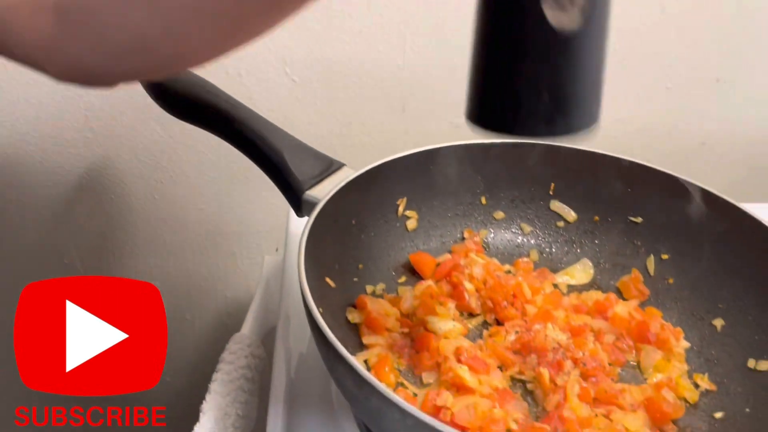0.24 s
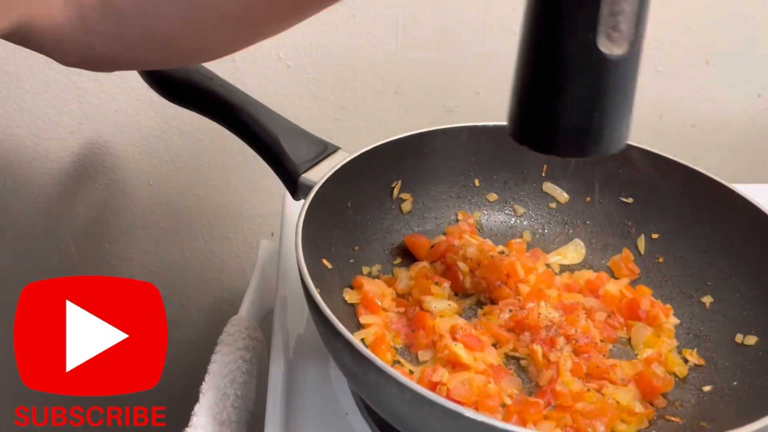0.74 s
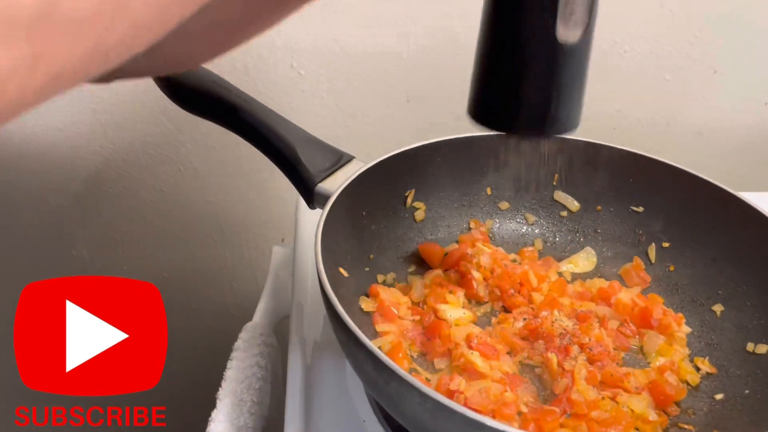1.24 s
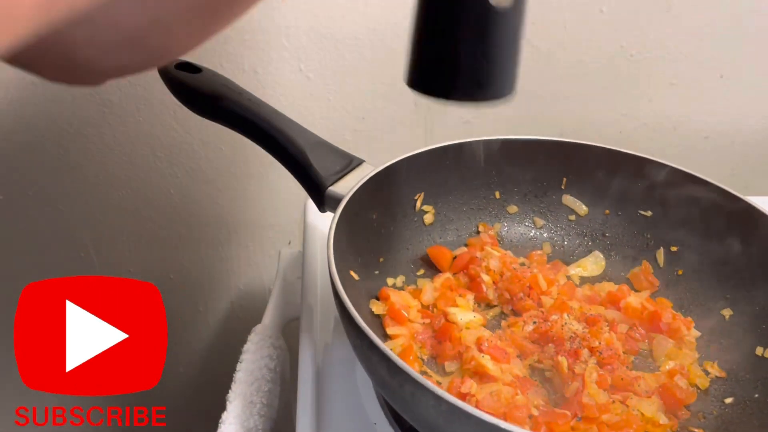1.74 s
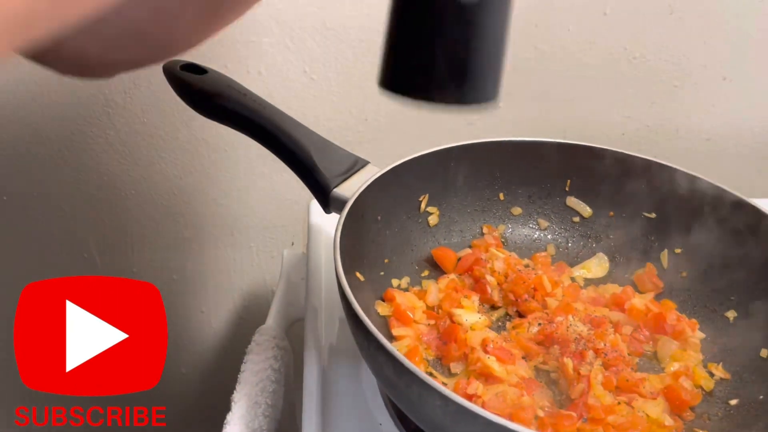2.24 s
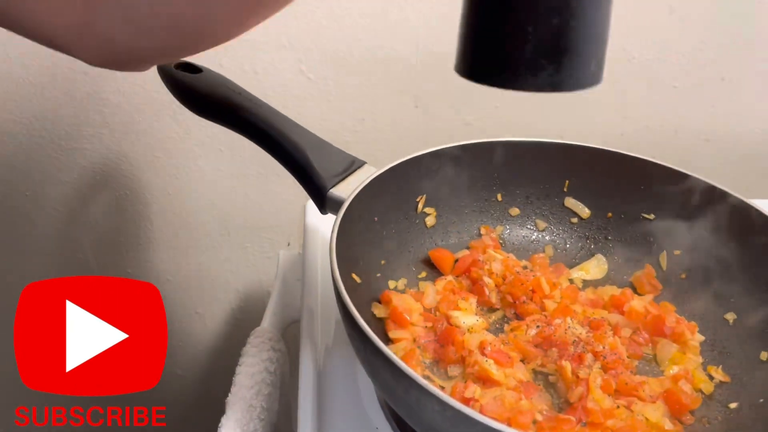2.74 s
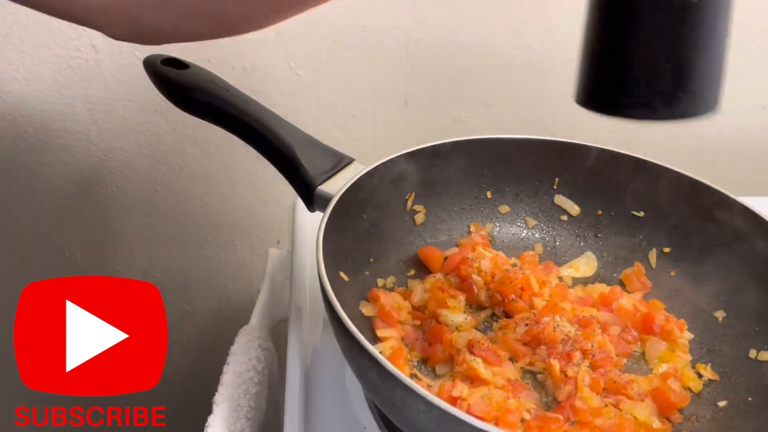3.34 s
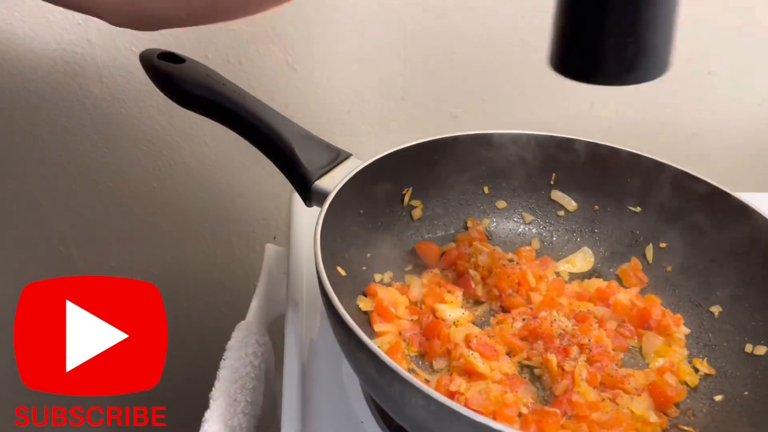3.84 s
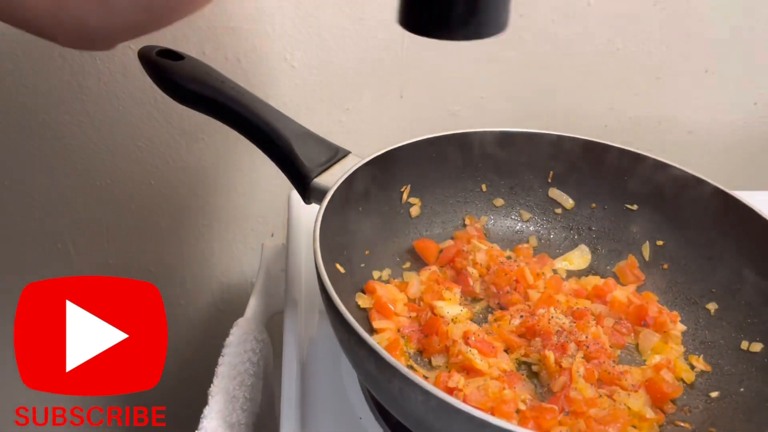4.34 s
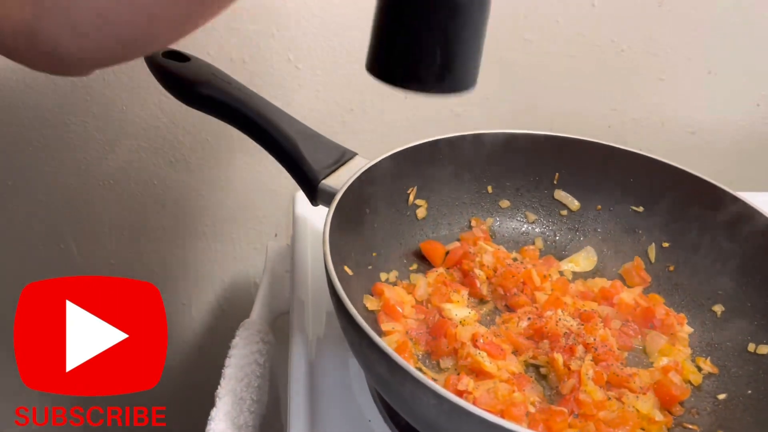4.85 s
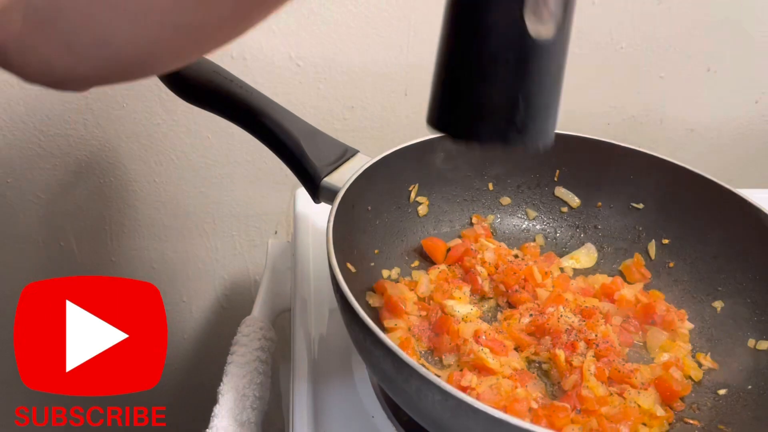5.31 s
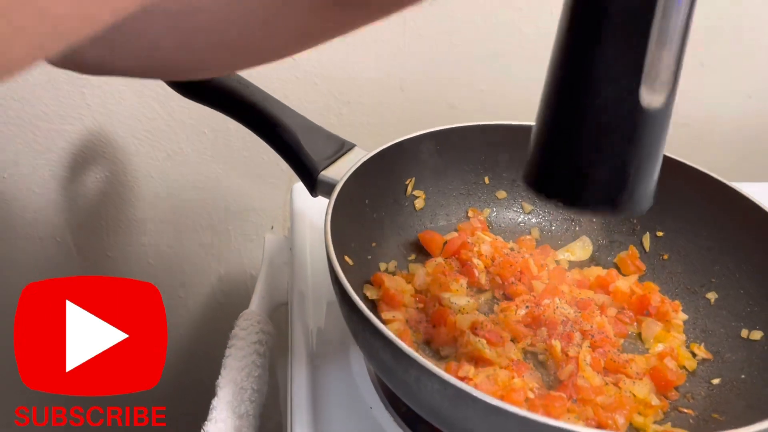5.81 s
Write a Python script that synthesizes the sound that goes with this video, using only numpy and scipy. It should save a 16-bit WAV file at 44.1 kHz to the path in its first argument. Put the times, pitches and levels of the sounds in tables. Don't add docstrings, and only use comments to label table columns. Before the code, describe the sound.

Dry peppercorns snap and grind in a hollow mill, twist after twist, while vegetables fry with fine hiss and spitting fat in a humming kitchen.

```python
import sys
import numpy as np
from scipy import signal
from scipy.fft import rfft, irfft, next_fast_len
from scipy.io import wavfile
from scipy.ndimage import uniform_filter1d

SR = 44100
rng = np.random.default_rng(int(sys.argv[2]) if len(sys.argv) > 2 else 0)


def put_to_file(sound):
    columns = np.atleast_2d(sound).T
    safe = np.clip(columns, -1, 1)
    whole_steps = np.round(safe * 32767)
    wavfile.write(sys.argv[1], SR, whole_steps.astype(np.int16))


def linear_from_db(decibels):
    return 10 ** (np.asarray(decibels, float) / 20)


N = 267907
PADDED = next_fast_len(N)
HZ = np.fft.rfftfreq(PADDED, 1 / SR)

# start_s, peak_db, low_db (0.5-1.4 kHz), ring_hz (favoured by the grip)
CRACKS = [(0.018, -12.5, -7.5, 3540), (0.032, -15.5, -23, 3700), (0.523, -20.5, -14, 2340),
          (0.574, -15.5, -39, 4400), (0.608, -11.5, -16.5, 3240), (0.613, -11.5, -19, 2210),
          (0.652, -5, -16.5, 4200), (1.104, -17.5, -23, 4270), (1.122, -16, -16, 2600),
          (1.164, -10, -12.5, 1650), (1.199, -20.5, -26, 4400), (1.713, -18.5, -7.5, 4200),
          (1.748, -19.5, -18, 3040), (1.756, -19, -16, 3020), (2.27, -20.5, -11, 3180),
          (2.321, -15, -18, 2230), (2.35, -19.5, -29, 3470), (2.416, -12.5, -9, 3030),
          (2.849, -16.5, -9, 4030), (2.878, -20.5, -22, 3080), (2.919, -15, -14.5, 4150),
          (3.4333, -8, -11.5, 2070), (3.478, -15.5, -11, 3360), (4.514, -6.5, -10.5, 3500),
          (4.54, -5, -10.5, 3570), (5.105, -17, -6, 3300), (5.591, -15.5, -13, 4330),
          (5.628, -16.5, -12, 4200), (5.639, -11.5, -6.5, 4180), (5.688, -20.5, -5, 2070)]
# pitch_hz, width_hz, level_db
BODY = [(417, 123, -14), (702, 140, -13.5), (998, 140, -8), (1396, 350, -6), (1933, 230, -1.5),
        (2167, 290, -2.5), (2608, 330, -3), (3102, 130, 0), (3570, 210, -1.5), (4080, 250, -2.5),
        (4480, 300, -4.5), (5360, 1000, -7.5), (6900, 2000, -10.5)]
BODY_HZ = np.array(BODY)[:, 0]


def rms_one(x):
    return x / np.sqrt(np.mean(x ** 2) + 1e-20)


def at_hz(points, hz):
    table = np.array(points)
    return np.interp(np.log(np.maximum(hz, 1)), np.log(table[:, 0]), table[:, 1])


def drift(rate_hz):
    points = rng.standard_normal(1000)
    return np.interp(np.arange(N) / SR * rate_hz, np.arange(1000), points)


def resonate(x, hz, width_hz):
    r = np.exp(-np.pi * width_hz / SR)
    feedback = [1, -2 * r * np.cos(2 * np.pi * hz / SR), r * r]
    return signal.lfilter([(1 - r * r) / 2, 0, (r * r - 1) / 2], feedback, x)


def grains(size, per_s, spread_db):
    sizes = linear_from_db(spread_db * np.minimum(rng.exponential(1, size), 5)) * rng.choice([-1, 1], size)
    return sizes * (rng.random(size) < per_s / SR) + 1e-18


def filtered(x, response):
    return irfft(rfft(x, PADDED) * response, PADDED)[..., :N]


def coloured(x, spectrum):
    return rms_one(filtered(x, linear_from_db(at_hz(spectrum, HZ))))


def pair(shared, own):
    # pitch_hz, likeness [0-1]
    likeness = [(40, .99), (130, .82), (300, .66), (1000, .6), (3000, .8), (5000, .66), (6200, .78),
                (9000, .86), (15000, .9)]
    alike = np.clip(at_hz(likeness, HZ), 0, 1)
    both = filtered(shared, np.sqrt((1 + alike) / 2))
    apart = filtered(own, np.sqrt((1 - alike) / 2))
    return np.array([both + apart, both - apart])


def fan():
    # pitch_hz, level_db (per Hz)
    air_spectrum = [(15, -37), (30, -30), (45, -8.5), (58, -4), (74, -8), (85, -3), (100, -10), (140, -14),
                    (300, -15), (500, -20), (640, -9.5), (850, -17.5), (1500, -18.5), (3000, -47.5)]
    # order, level_db (rms)
    orders = [(1, -59.5), (2, -58), (3, -65), (6, -73), (7, -74), (8, -74)]
    motor_hz, buzz_hz, air_db, buzz_db = 58.56, 119.98, -51, -61.5
    t = np.arange(N) / SR
    motor = sum(linear_from_db(db) * np.sin(2 * np.pi * order * motor_hz * t) for order, db in orders)
    buzz = linear_from_db(buzz_db) * np.sin(2 * np.pi * (buzz_hz * t + 0.25))
    air = pair(*coloured(rng.standard_normal((2, N)), air_spectrum))
    return linear_from_db(air_db) * air + np.sqrt(2) * (motor + buzz)


def sizzle():
    # start_s, level_db
    loudness = np.array([(0.0, -48), (0.57, -48.5), (0.94, -48.5), (1.79, -48), (3.33, -48), (4.56, -47.5),
                         (4.8, -48), (5.78, -48.5), (6.07, -48)])
    # pitch_hz, level_db (per Hz)
    fry_spectrum = [(700, -11), (1200, -5), (2100, -2.5), (2900, -3), (4100, -1.5), (4900, -2), (6500, 0),
                    (9600, 0), (11500, -2), (13300, -3.5), (15000, -1), (16500, -1)]
    pitches_hz, ports = np.geomspace(1200, 15000, 14), []
    busy = linear_from_db(5.0 * drift(12) + 2.5 * drift(25))
    for _ in range(2):
        force = grains(N, 5000 * busy, 2.93)
        dealt = rng.integers(0, 14, N)
        fizz = np.zeros(N)
        for k, hz in enumerate(pitches_hz):
            bursts = force * (dealt == k) + 1e-18
            fizz += rms_one(resonate(bursts, hz, 0.21 * hz)) * np.sqrt(hz)
        steam = rng.standard_normal(N)
        ports.append(coloured(0.56 * rms_one(fizz) + 0.84 * steam, fry_spectrum))
    level_db = np.interp(np.arange(N) / SR, loudness[:, 0], loudness[:, 1])
    return linear_from_db(level_db + 9.0) * pair(*ports)


def kitchen(x):
    t60_s, level_db = 0.17, -7.5
    t = np.arange(12000) / SR
    tail = rng.standard_normal((2, 12000)) * linear_from_db(-60 * t / t60_s) * np.clip(t / 0.002, 0, 1)
    tail = signal.sosfilt(signal.butter(1, 5000, fs=SR, output="sos"), tail)
    tail /= np.sqrt(np.sum(tail ** 2, axis=1, keepdims=True))
    return linear_from_db(level_db) * signal.fftconvolve(x[None], tail, axes=1)[:, :N]


def spits():
    # start_s, peak_db, pitch_hz
    bursts = [(0.2154, -34, 5670), (0.4337, -16.5, 5500), (0.8574, -33, 5970), (1.4074, -21, 6490),
              (1.446, -14, 6200), (1.5867, -20, 3570), (1.616, -20, 5000), (2.1363, -27, 5670),
              (2.339, -11, 3860), (2.536, -19, 5840), (2.8624, -16, 11000), (3.175, -29.5, 6000),
              (3.2048, -18, 7050), (3.706, -18, 3470), (4.688, -22.5, 3820), (5.2704, -24.5, 6240),
              (0.851, -13.5, 13000), (1.4849, -23, 10100), (1.5923, -9.5, 11100), (1.598, -20, 12700),
              (3.053, -21.5, 11000), (3.35, -16, 10300), (3.572, -21, 10400), (3.755, -19, 12550),
              (4.0228, -14, 11700), (4.768, -19, 11100), (4.8094, -24, 11800), (5.403, -20, 11600),
              (5.7598, -24, 11100), (5.809, -20.5, 11870)]
    out = np.zeros((2, N + 400))
    for s, peak_db, hz in bursts:
        force = rng.standard_normal(400) * linear_from_db(-60 * np.arange(400) / SR / 0.008)
        tick = resonate(force, hz, 0.5 * hz) + 0.39 * np.diff(force, prepend=0)
        for port, late in enumerate(rng.integers(0, 3, 2)):
            at = round(s * SR) + late
            out[port, at:at + 390] += linear_from_db(peak_db - 4.0) * tick[:390] / np.abs(tick).max()
    return out[:, :N]


def jolts():
    # start_s, peak_db, pitch_hz
    pushes = [(0.018, -35, 464), (0.615, -35, 476), (0.652, -41, 620), (1.163, -23, 420), (1.755, -27, 453),
              (2.416, -45, 605), (2.85, -37.5, 390), (3.436, -24.5, 370), (3.478, -37, 456),
              (4.012, -36, 276), (4.514, -33, 520), (4.538, -37.5, 409), (5.104, -29, 545),
              (5.59, -58, 464), (5.638, -39, 458)]
    out = np.zeros(N + 2000)
    for s, peak_db, hz in pushes:
        force = rng.standard_normal(2000) * linear_from_db(-60 * np.arange(2000) / SR / 0.0062)
        hollow = resonate(force, hz, 0.33 * hz)
        air = resonate(force, 0.64 * hz, 1.2 * hz)
        knock = resonate(hollow + 1.1 * air, 0.68 * hz, 0.6 * hz)
        at = round(s * SR)
        out[at:at + 2000] += linear_from_db(peak_db - 6.0) * knock / np.abs(knock).max()
    return out[:N]


def mill_body(force, colour_db):
    # pitch_hz, width_hz, level_db
    shell = [(8300, 1500, -14), (11000, 2500, -21), (15000, 2500, -24)]
    ring = np.zeros(len(force))
    for hz, width_hz, db in shell:
        ring += linear_from_db(db + 1.0 + colour_db[-1] / 2) * resonate(force, hz, width_hz)
    for k, (hz, width_hz, db) in enumerate(BODY):
        ring += (-1) ** k * linear_from_db(db + colour_db[k]) * resonate(force, hz, width_hz)
    return ring


def crunch():
    # start_s, length_s, grinding_db, burr_ring_db
    twists = [(0.0, 0.042, -39, 0.1), (0.522, 0.24, -39.5, 1.5), (1.101, 0.068, -32, 5.5),
              (1.686, 0.094, -28, 0.5), (2.25, 0.1, -38, 4.5), (2.824, 0.07, -31, 4),
              (3.372, 0.2, -40.5, -2), (3.915, 0.088, -32.5, -3), (4.481, 0.13, -34.5, -5.5),
              (5.041, 0.11, -37, 7.5), (5.582, 0.061, -32.5, -1)]
    grip_s, let_go_db_per_s = 0.0075, 400
    debris_db, debris_db_per_s = -13, 756
    t, level, burr = np.arange(N) / SR, np.zeros(N), np.ones(N)
    for s, length_s, level_db, burr_db in twists:
        ease_db = let_go_db_per_s * np.maximum(t - s - length_s, 0)
        level += np.clip((t - s) / grip_s, 0, 1) * linear_from_db(level_db - ease_db)
        burr[t > s] = linear_from_db(burr_db)
    for s, peak_db, *_ in CRACKS:
        level += (t > s) * linear_from_db(peak_db + debris_db - debris_db_per_s * np.maximum(t - s, 0))
    force = grains(N, 1100 * linear_from_db(6.5 * drift(70)), 3.7)
    colour_db = at_hz([(600, 2.5), (2200, 8.5), (4200, -1), (8000, -3.0)], BODY_HZ)
    grind = rms_one(mill_body(force, colour_db))
    singing = 0.67 * burr * rms_one(resonate(force, 4200, 200))
    return (grind + singing) * uniform_filter1d(level * linear_from_db(-10.0), size=80)


def fractures(table, crumble_s):
    size = 4000
    out, t = np.zeros(N + size), np.arange(size) / SR
    for s, peak_db, low_db, ring_hz in table:
        force = grains(size, 3500, 2.46) * linear_from_db(-20 * t / crumble_s)
        force[:30] *= 1.6
        force[0] += 3.0
        top_db = -3 - 0.08 * (peak_db + 16.5)
        colour_db = at_hz([(900, low_db + 18.5), (2200, 0.0063), (4000, 2.9), (6500, top_db)], BODY_HZ)
        favour_db, favour_octaves = 6 - 0.1 * (peak_db + 19), 0.13
        colour_db += favour_db * np.exp(-0.5 * (np.log2(BODY_HZ / ring_hz) / favour_octaves) ** 2)
        ring = mill_body(force, colour_db + 0.85 * rng.standard_normal(len(BODY)))
        ring += 0.033 * resonate(force, 2100, 1700)
        at = round(s * SR)
        out[at:at + size] += linear_from_db(peak_db + 0.5) * ring / np.abs(ring).max()
    return out[:N]


def chips():
    # start_s, peak_db, low_db (0.5-1.4 kHz), ring_hz (favoured by the grip)
    fragments = [(0.142, -27.5, -8, 2460), (0.544, -18.5, -33, 2350), (1.697, -22, -10.5, 4300),
                 (1.824, -30, -26, 4100), (2.251, -32, -26, 4130), (2.834, -21, -16, 4230),
                 (2.908, -23, -23, 3100), (2.978, -25.5, -25, 4400), (3.0085, -27.5, -11, 2600),
                 (3.376, -23, -30, 3730), (3.423, -20, -10, 2160), (3.927, -29, -18, 4270),
                 (3.945, -23, -12, 2240), (3.993, -28.5, 6, 1000), (4.011, -28.5, -6, 2270),
                 (4.487, -26.5, 2, 3800), (4.939, -33, -20, 2460), (5.04, -29, -5.5, 4140),
                 (5.067, -22, -8, 3300), (5.178, -32, -20, 4240)]
    return fractures(fragments, crumble_s=0.015)


def cracks():
    return fractures(CRACKS, crumble_s=0.011)


def scene():
    mill = cracks() + chips() + crunch() + jolts()
    drops = spits()
    return mill + drops + kitchen(mill + drops[0]) + sizzle() + fan()


def roll_off(x):
    return signal.sosfilt(signal.butter(12, 16650, fs=SR, output="sos"), x)


def record(dry):
    # pitch_hz, level_db (left minus right)
    tilt = [(25, 0), (60, 2), (125, -4.5), (250, 2.5), (600, -0.5), (1200, -1), (2500, 2.5), (5000, 2.5),
            (7500, -0.2), (15000, -2)]
    # pitch_hz, lag [turns]
    trail = [(5300, 0), (6900, .2), (8270, .5), (11500, 1), (14800, 1.5), (18000, 2)]
    half = linear_from_db(at_hz(tilt, HZ) / 2) * np.exp(-1j * np.pi * at_hz(trail, HZ))
    ports = filtered(dry, np.array([half, 1 / half]))
    return roll_off(ports)


dry = scene()
out = record(dry)
put_to_file(out)
```